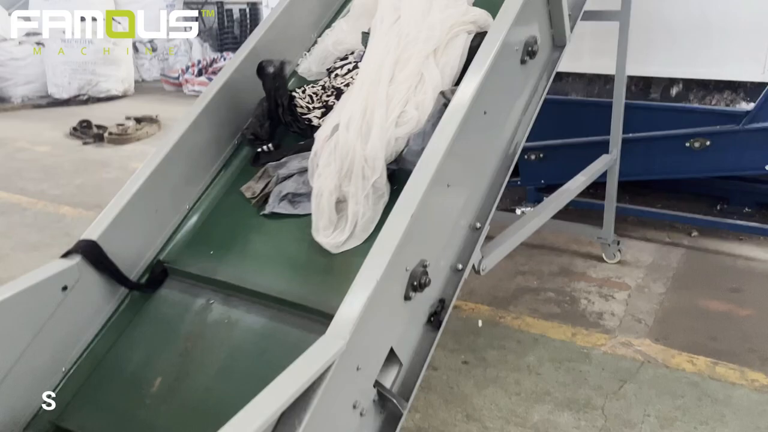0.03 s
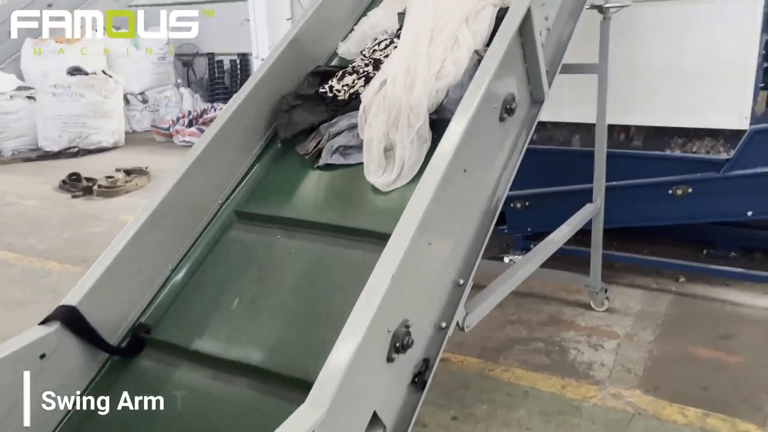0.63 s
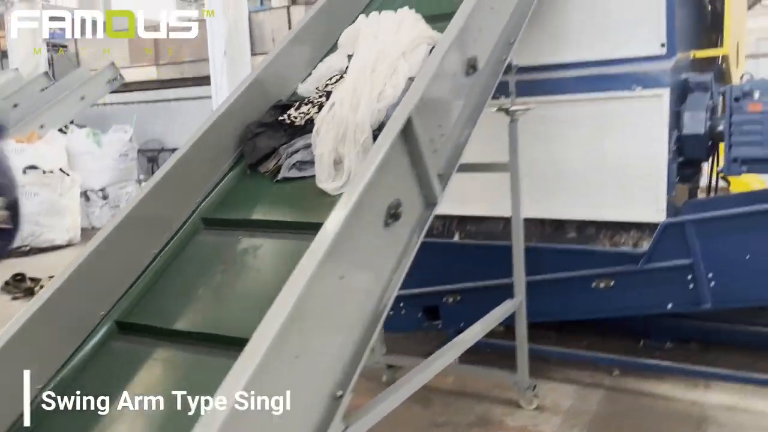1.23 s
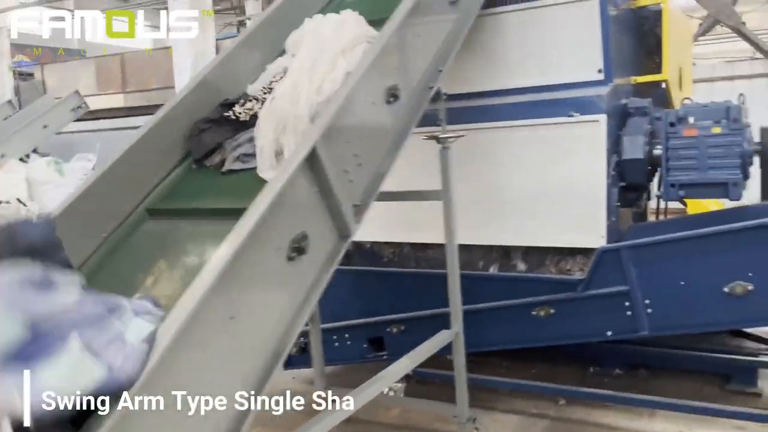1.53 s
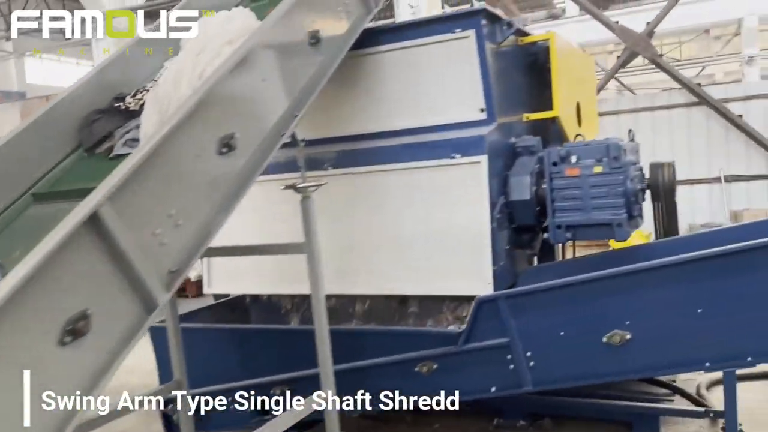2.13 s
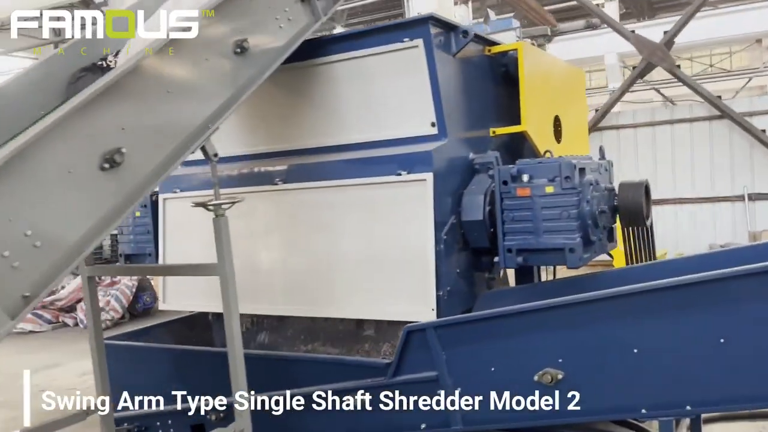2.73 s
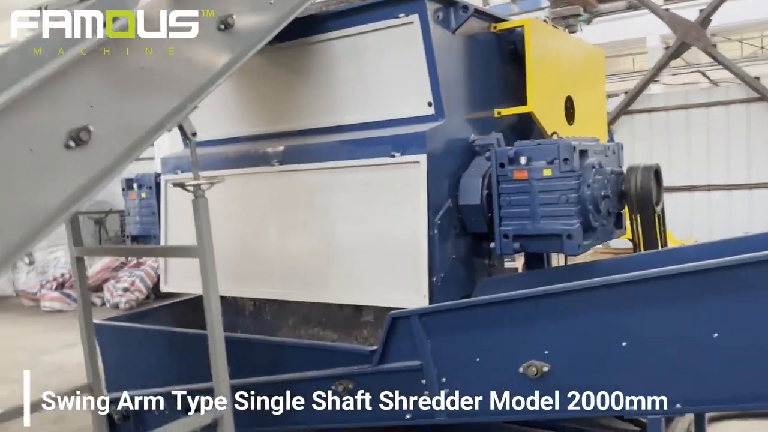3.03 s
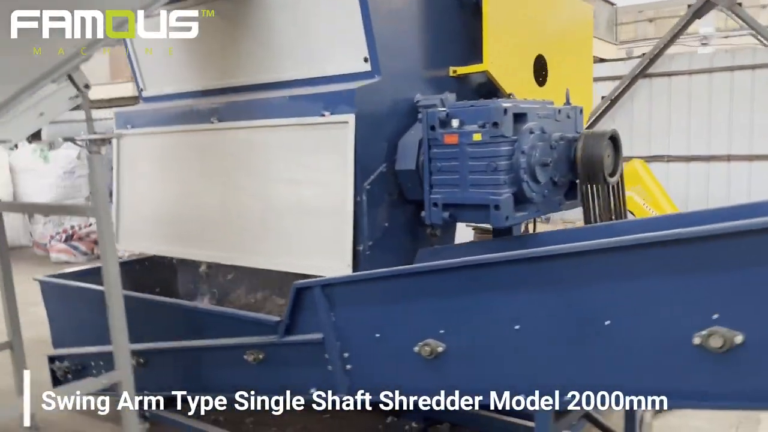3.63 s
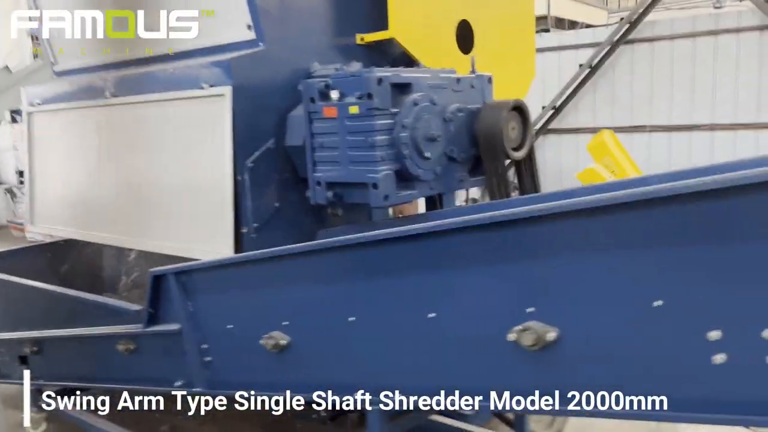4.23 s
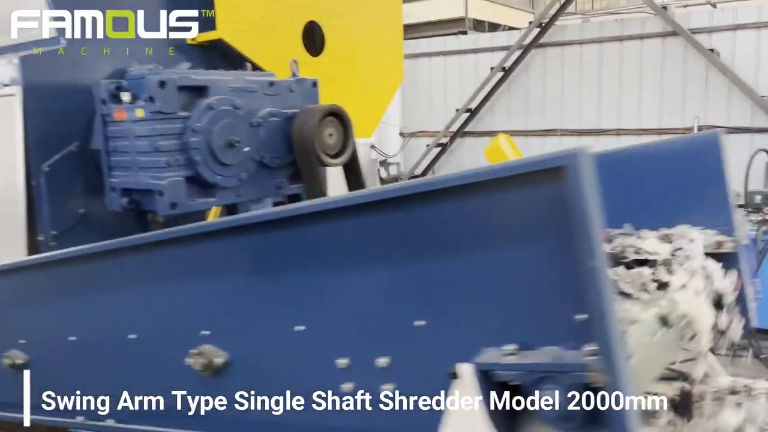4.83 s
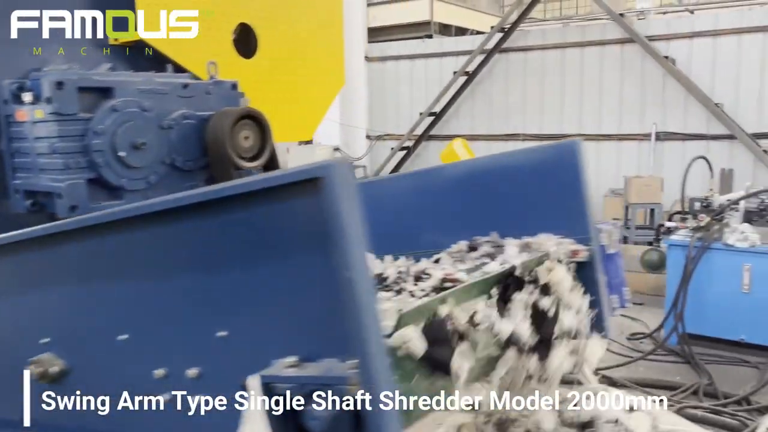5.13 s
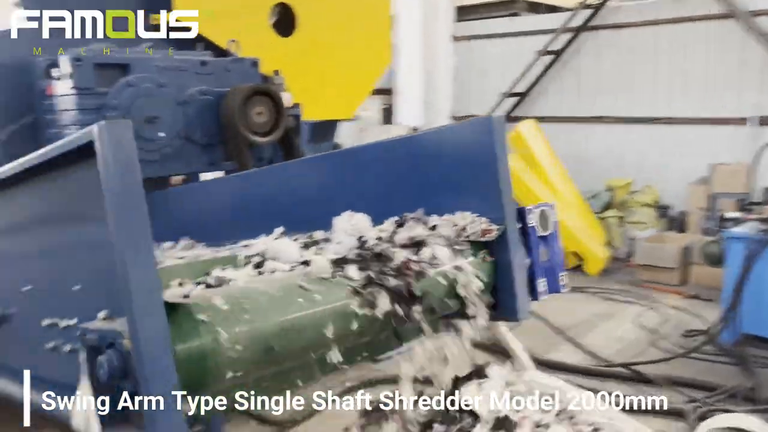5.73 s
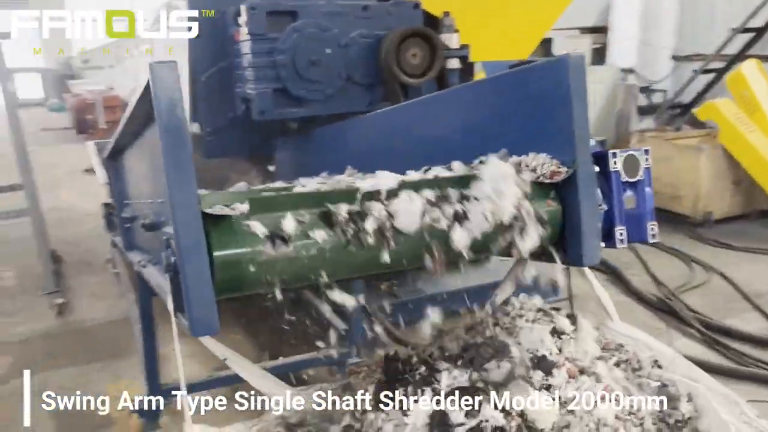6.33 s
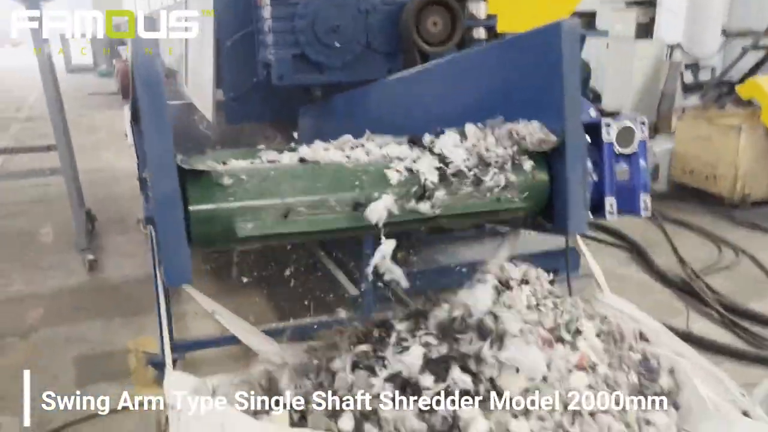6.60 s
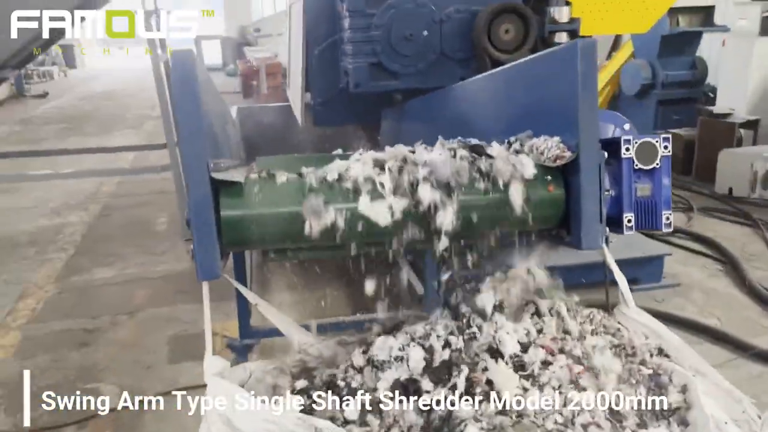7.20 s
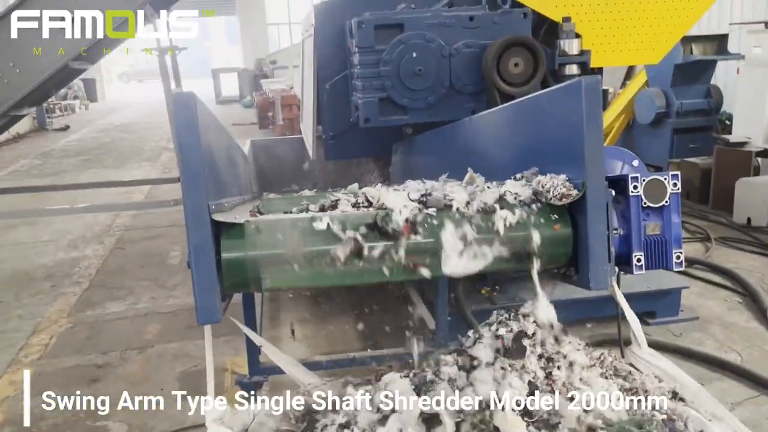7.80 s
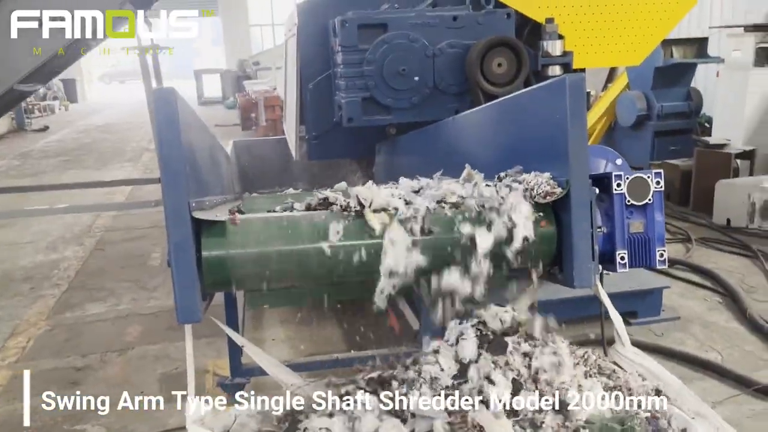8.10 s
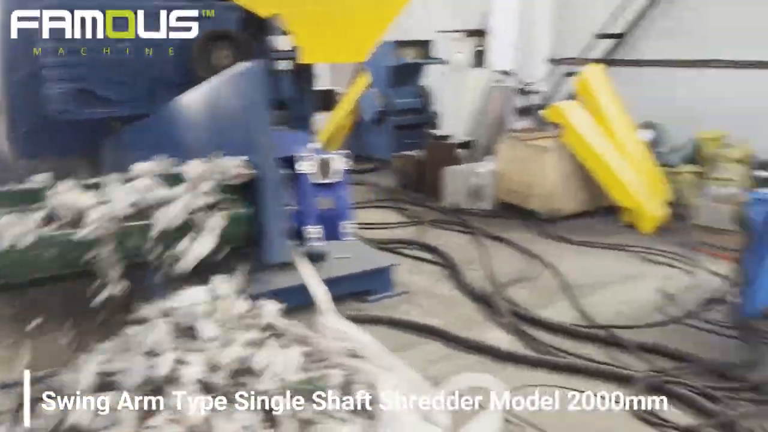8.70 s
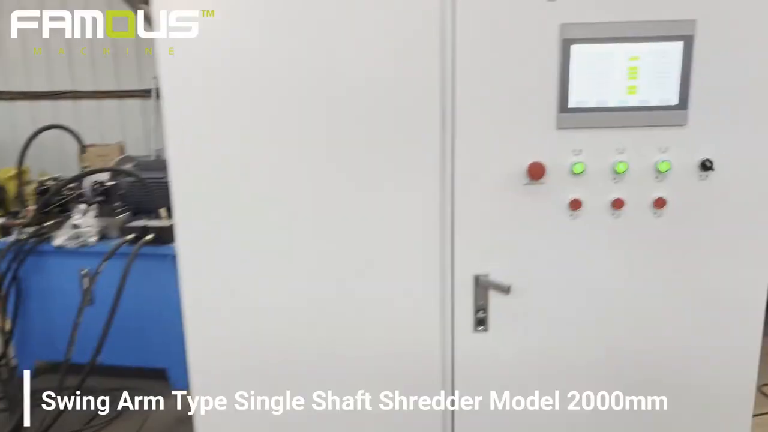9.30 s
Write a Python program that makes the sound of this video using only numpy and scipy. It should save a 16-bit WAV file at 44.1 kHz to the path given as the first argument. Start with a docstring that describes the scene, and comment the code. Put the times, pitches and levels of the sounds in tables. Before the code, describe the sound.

A large shredder roars and rumbles in a factory hall, tearing cloth with dull thuds while shreds rustle off a belt.

```python
"""A factory hall, walking beside a single-shaft shredder from its feed belt to its discharge belt.
It chews textile waste: rotor knives thump the steel housing about twenty times a second, and the
roar and the tearing swell with each load. Thick wads jolt the body, a panel drones, tones come and
go, metal chinks, and shreds rustle and tick off the belt. The hall smears the cutting and shreds.
Heard through a microphone with two close ports; the sound starts abruptly."""
import sys
import numpy as np
from scipy import signal
from scipy.fft import rfft, irfft, next_fast_len
from scipy.io import wavfile
from scipy.ndimage import uniform_filter1d, map_coordinates

SR = 44100
rng = np.random.default_rng(int(sys.argv[2]) if len(sys.argv) > 2 else 0)


def to_wav(sig):
    """Store sig (one row per channel, or 1-D mono) as 16-bit WAV at the path in sys.argv[1].

    Samples outside -1..1 are clipped; the rate is SR.
    """
    pcm = np.clip(np.atleast_2d(sig), -1, 1) * 32767
    pcm = np.round(pcm).astype(np.int16)
    wavfile.write(sys.argv[1], SR, pcm.T)  # frames by channels


N = 421155


def amp(db):
    """Decibels to gain."""
    return 10 ** (np.asarray(db) / 20)


def unit(x):
    """Scale to rms 1."""
    return x / np.sqrt(np.mean(x ** 2) + 1e-20)


def along(points, hz):
    """Read (f/Hz, value) points on a log axis."""
    f, v = np.transpose(points)
    return np.interp(np.log(hz + 1), np.log(f + 1), v)


def curves(rows):
    """One value per sample for each column after the time."""
    times, *columns = np.transpose(rows)
    return [np.interp(np.arange(N) / SR, times, column) for column in columns]


def wobble(rate):
    """A smooth random curve, rate knots a second."""
    return map_coordinates(rng.standard_normal(int(N * rate / SR) + 4), [np.arange(N) * rate / SR])


def noise():
    """A pair of white noises: what both microphone ports share, and what sets them apart."""
    return rng.standard_normal((2, N))


def centred(x):
    """One signal as a pair: all shared by the ports, nothing apart."""
    return np.array([x, np.zeros(N)])


def filtered(x, response):
    """x through a complex frequency response."""
    size = next_fast_len(N + SR // 2, real=True)
    return irfft(rfft(x, size) * response(np.fft.rfftfreq(size, 1 / SR)), size)[..., :N]


def coloured(x, spectrum):
    """x shaped by a (f/Hz, level/dB) spectrum, at rms 1."""
    return unit(filtered(x, lambda hz: amp(along(spectrum, hz))))


def ringing(x, modes):
    """x through steep-sided resonances, at rms 1."""
    band = lambda f, hz, width: (2j * f * width / (hz * hz - f * f + 2j * f * width)) ** 2
    return unit(filtered(x, lambda f: sum(amp(db) * band(f, hz, width) for hz, width, db in modes)))


def steadied(x):
    """Keep the fast beating of a vibration but hold it at rms 1 over a quarter second."""
    return x / np.sqrt(np.abs(uniform_filter1d(x * x, size=SR // 4)) + 1e-9)


def grains(rate, spread_db):
    """Tiny random clicks of varying size, rate a second."""
    size = amp(spread_db * np.minimum(rng.exponential(size=N), 4))
    return unit(noise() * size * (rng.random(N) < rate / SR))


def patchy(x, depth_db):
    """Each scrap has its own pitch: the colour shifts from moment to moment."""
    spectra = signal.stft(x, nperseg=512)[2]
    patches = uniform_filter1d(rng.standard_normal(spectra.shape[1:]), size=5, axis=0)
    patches = uniform_filter1d(patches, size=7, axis=1)
    return signal.istft(spectra * amp(depth_db * unit(patches)), nperseg=512)[1][:, :N]


def bursts(hits, attack_s, t60):
    """The envelope of (t/s, level/dB) hits that rise quickly and die away."""
    t, out = np.arange(SR // 2) / SR, np.zeros(N + SR)
    for s, db in hits:
        out[round(s * SR):][:len(t)] += amp(db - 60 * t / t60) * (1 - np.exp(-t / attack_s))
    return out[:N]


def hum(hz, waver_hz, sway_db):
    """A tone of rms 1 whose pitch and strength waver at random."""
    phase = 2 * np.pi * np.cumsum(hz + waver_hz * wobble(7)) / SR
    return unit(np.sin(phase) * amp(sway_db * wobble(11)))


# the hall's reverberation time: f/Hz, t60/s
HALL_DECAY = [(100, 0.97), (1000, 1.36), (4000, 0.65), (12000, 0.25)]
def hall(x, wet_db):
    """Add the hall's diffuse tail: shortest in the treble, new every quarter second of the walk."""
    out, step = np.pad(x, ((0, 0), (0, 2 * SR))), SR // 4
    for i in range(0, N, step):
        hz, t, spectra = signal.stft(rng.standard_normal((2, SR // 2)), SR, nperseg=256)
        decay = amp(-60 * t / along(HALL_DECAY, hz)[:, None])
        tail = signal.istft(spectra * decay, SR, nperseg=256)[1]
        echo = signal.fftconvolve(x[:, i:i + step], tail / np.linalg.norm(tail[0]), axes=1)
        out[:, i:i + echo.shape[1]] += amp(wet_db) * echo
    return out[:, :N]


# the side panel's drone, loudest as the microphone passes it: t/s, level/dB
PANEL_LEVEL = [(0.14, -30.5), (0.9, -29.5), (1.27, -22.5), (1.38, -24), (1.52, -14), (1.8, -20.5),
               (2.0, -16), (2.3, -19.5), (2.5, -19), (2.7, -17.5), (2.85, -23.5), (3.3, -20), (3.6, -29.5),
               (3.9, -23), (4.3, -25.5), (6.0, -36), (6.45, -29.5), (7.0, -31), (9.55, -32)]
# its resonance: f/Hz, width/Hz, level/dB
PANEL_MODE = [(187, 14, 0)]
def side_panel():
    """The gear drones through a panel: the closer it is, the more the tone stands out of its rumble."""
    drone_db, = curves(PANEL_LEVEL)
    tone_share = np.clip((drone_db - np.median(drone_db)) / 5, 0, .72)
    tone = centred(steadied(hum(hz=187.5, waver_hz=2.7, sway_db=2)))
    rumble = steadied(ringing(noise(), PANEL_MODE))
    return amp(drone_db) * (np.sqrt(tone_share) * tone + np.sqrt(1 - tone_share) * rumble)


# tones, low hums and one rasp along the walk: start/s, end/s, f/Hz, width/Hz, level/dB
SWELLS = [(3.7, 4.55, 422, 22, -23), (3.1, 4.4, 630, 180, -29), (0.5, 1.5, 764, 11, -37.5),
          (0.0, 1.2, 692, 11, -41.5), (0.0, 1.7, 370, 55, -39), (6, 8.6, 430, 53, -43),
          (1.2, 2.6, 3680, 130, -43), (1.87, 1.945, 3600, 150, -33), (4.5, 6.4, 2520, 260, -42),
          (9.25, 9.55, 2400, 180, -45), (5.08, 5.26, 96, 12.3, -16.5), (5.3, 5.6, 76, 5.2, -18.5),
          (6.12, 6.58, 73, 5.1, -21), (4.04, 4.34, 2100, 600, -34), (8.1, 8.55, 150, 16, -23),
          (1.15, 2.1, 290, 35, -26), (1.7, 2.05, 71, 6.1, -18), (4.08, 4.3, 318, 19, -22.5),
          (3.95, 4.15, 475, 22, -24), (3.35, 3.6, 330, 49, -23), (7.4, 8.4, 85, 5, -28.5)]
def tones_and_rasp():
    """Wavering tones and low hums swell and fade, plus a brief rasp of tearing cloth near 2 kHz."""
    t, out = np.arange(N) / SR, np.zeros(N)
    for start, end, hz, width, db in SWELLS:
        inside = (t > start) & (t < end)
        age = t[inside] - start
        knots = rng.standard_normal((2, int((end - start) * width * 2) + 4))
        drift, sway = [map_coordinates(k, [age * width * 2]) for k in knots]
        swell = np.sqrt(np.abs(np.sin(np.pi * age / (end - start))))
        tone = np.sin(2 * np.pi * np.cumsum(hz + 0.611 * width * drift) / SR)
        out[inside] += amp(db) * swell * unit(tone * amp(5.5 * sway))
    return centred(out)


# metal chinking on metal: t/s, f/Hz, relative level/dB, t60/s
METAL_CHINKS = [(0.458, 3600, -22, .14), (1.03, 3620, -27, 0.19), (1.235, 3600, -24, 0.19),
                (1.52, 3600, -31, .1), (1.591, 3700, -28, .1), (1.658, 3600, -30, .1),
                (1.775, 3700, -27, .1), (1.885, 3640, -20, 0.14), (1.905, 3550, -20, 0.15),
                (2.566, 3650, -24, .12), (4.93, 2400, -29, .04), (5.111, 2630, -18, .05),
                (5.132, 2470, -19, 0.045), (5.15, 2370, -17, .05), (5.164, 2420, -18, .04),
                (5.183, 2580, -25, .04), (5.212, 2580, -13, 0.051), (5.26, 2400, -19, 0.054),
                (5.347, 2930, -22, 0.059), (6.383, 3650, -25, 0.078), (9.475, 2840, -25, .12)]
def chinks():
    """Each chink rings briefly on a close pair of steel modes, roughened by the rubbing."""
    t, out = np.arange(SR // 4) / SR, np.zeros(N + SR)
    attack = 1 - np.exp(-t / 0.0011)
    for s, hz, db, t60 in METAL_CHINKS:
        detune = rng.normal(1, .012, (2, 1))
        pitch = hz * (detune + .3 * rng.standard_normal((2, len(t))))
        ring = np.sin(2 * np.pi * np.cumsum(pitch, axis=1) / SR).sum(axis=0)
        out[round(s * SR):][:len(t)] += ring * amp(db - 9.5 - 60 * t / t60) * attack
    return centred(out[:N])


# loose shreds on the belt: t/s, relative level/dB
RUSTLE_LEVEL = [(0.14, -53), (1.2, -51), (1.22, -46), (1.95, -39.5), (2.3, -42), (3.14, -39.5), (3.17, -37),
                (3.47, -29.5), (4.15, -35), (4.46, -33.5), (4.68, -32.5), (4.75, -36.5), (5.15, -40),
                (5.33, -31.5), (5.68, -30.5), (6.0, -47.5), (6.3, -45), (6.45, -41.5), (7.9, -51),
                (8.7, -48.5), (9.55, -46)]
# their bright rustle: f/Hz, level/dB
RUSTLE_SPECTRUM = [(3000, 2.5), (6000, 5.5), (8000, 3.5), (10000, 8), (12000, 2.5), (14000, 6.5),
                   (15800, -30)]
def shreds():
    """Loose shreds rustle in quick and slow clumps."""
    rustle_db, = curves(RUSTLE_LEVEL)
    crackle = grains(rate=14000, spread_db=2.9)
    clumps_db = 2.7 * wobble(43) + 0.4 * wobble(4.9)
    return amp(rustle_db - 5.5 + clumps_db) * coloured(patchy(crackle, depth_db=3.0), RUSTLE_SPECTRUM)


# hard scraps among the shreds: t/s, relative level/dB, offset for the crack/dB
SCRAP_SNAPS = [(0.4464, -38, 7), (0.5428, -36, -3), (1.006, -40, 15), (2.53, -26, 3), (2.7077, -33, 4),
               (3.1572, -19, -8), (3.1926, -29, 3), (3.4501, -20.5, -1), (3.615, -28, -7),
               (4.3056, -26, -3), (4.4772, -33, -7), (4.6638, -21.5, -15), (4.792, -30, -2),
               (4.8499, -29, -3), (4.9402, -29, -1), (4.9626, -29, -2), (5.1148, -25, -11),
               (5.12, -28, -11), (5.2046, -26, -7), (5.341, -24, -4), (5.4525, -25, -10),
               (5.6421, -22, -13), (6.382, -41.5, 8), (6.955, -38, -2), (8.1998, -32, -1), (9.0912, -38, 1),
               (9.1147, -30, -1), (9.2399, -44, 1), (9.2928, -37, -3)]
def snaps():
    """A hard scrap snaps: a tick as bright as the rustle, and a longer crack coloured like tearing."""
    tick = bursts([(s, db - 5) for s, db, _ in SCRAP_SNAPS], attack_s=0.00033, t60=0.035)
    crack = bursts([(s, db + offset - 6) for s, db, offset in SCRAP_SNAPS], attack_s=0.00055, t60=0.18)
    return tick * coloured(noise(), RUSTLE_SPECTRUM) + crack * coloured(noise(), TEAR_SPECTRUM)


# handfuls of shreds flying out: t/s, length/s, level/dB
HANDFULS = [(1.21, 0.09, -44), (1.885, 0.11, -42), (4.017, 0.038, -36), (4.225, 0.06, -34),
            (4.296, 0.09, -35), (4.5, 0.15, -32), (4.657, 0.051, -32), (5.283, 0.049, -40),
            (5.33, 0.09, -36), (5.5, 0.054, -34), (5.573, 0.064, -31), (5.64, 0.11, -40), (5.79, 0.06, -44),
            (6.37, 0.1, -43), (7.25, 0.27, -48)]
# their crisp hiss: f/Hz, level/dB
SPRAY_SPECTRUM = [(3000, -10), (6000, -2.5), (8500, -9), (10000, -5), (12000, -1.5), (14000, -3),
                  (15500, -8)]
def sprays():
    """A handful of shreds flies out as a bright burst of tiny ticks that rises fast and fades."""
    t, envelope = np.arange(N) / SR, np.zeros(N)
    for s, length, db in HANDFULS:
        envelope += amp(db) * np.interp((t - s) / length, [0, .2, .7, 1], [0, 1, .8, 0])
    return envelope * coloured(grains(rate=9000, spread_db=1.5), SPRAY_SPECTRUM)


# hard lumps inside the cutting chamber: t/s, relative level/dB
LUMP_HITS = [(1.701, -25), (1.716, -25), (2.106, -24), (2.13, -32), (2.675, -19), (2.735, -17), (3.04, -19),
             (3.246, -16), (3.296, -13.5), (3.371, -29), (3.441, -20), (3.54, -16), (3.625, -22),
             (3.766, -25), (4.351, -19), (4.449, -28), (5.215, -26), (5.81, -21)]
# their knock: f/Hz, level/dB
KNOCK_SPECTRUM = [(150, 4), (350, 5), (750, 8), (1200, -8), (2300, -7), (4000, -33), (8000, -26),
                  (15000, -55)]
def knocks():
    """A hard lump caught between the knives gives a short, dry knock."""
    return amp(2) * bursts(LUMP_HITS, attack_s=.001, t60=.09) * coloured(noise(), KNOCK_SPECTRUM)


# thick wads hitting the knives: t/s, thud level/dB, crunch level/dB, body jolt level/dB
WAD_HITS = [(1.02, -26, -38, -7.5), (1.25, -24, -42, -7), (1.705, -15.5, -39, -14), (2.112, -15, -35, -25),
            (2.71, -26, -26, -9), (3.04, -34, -30, -12), (3.17, -25, -25, -10.5), (3.27, -27, -30, -8.5),
            (3.441, -25, -33, -18), (4.079, -24, -37, -6.5), (4.15, -21, -28, -16), (4.35, -28, -25, -18),
            (5.11, -22.5, -42, -13), (5.216, -32, -34, -27), (5.45, -26, -40, -20), (6.265, -29, -46, -14),
            (6.325, -23, -44, -19), (6.372, -26, -31, -23), (6.43, -26, -40, -19), (7.30, -30, -41, -28),
            (9.11, -32, -42, -12.5)]
# a wad's thud: f/Hz, level/dB
THUD_SPECTRUM = [(40, -25), (80, -0.5), (200, -4), (400, -21), (900, -11), (3000, -32), (15000, -80)]
# its crunch: f/Hz, level/dB
CRUNCH_SPECTRUM = [(300, -16), (700, 10), (1200, -2), (2500, 3), (4000, -17), (8000, -30), (15000, -55)]
def wads():
    """A thick wad meets the knives with a dull thud and a gritty crunch."""
    thud = bursts([(s, db) for s, db, _, _ in WAD_HITS], attack_s=.004, t60=.25)
    crunch = bursts([(s, db) for s, _, db, _ in WAD_HITS], attack_s=.002, t60=.2)
    return thud * coloured(noise(), THUD_SPECTRUM) + crunch * coloured(noise(), CRUNCH_SPECTRUM)


# the deep shudder, fading on the way round to the discharge belt: t/s, level/dB
SHUDDER_REACH = [(0.14, 3.5), (3.3, -1), (5.3, -2.5), (5.7, -13), (9.55, -5.5)]
# resonances of the frame, the steel housing and the hopper walls: f/Hz, width/Hz, level/dB
FRAME_MODES = [(39.5, 3, -9), (46, 8, -15), (60.5, 7, 0)]
HOUSING_MODES = [(75.5, 14, -4.5), (97, 12.4, 4), (118.8, 19, -4)]
HOPPER_MODES = [(141.6, 7.7, -0.5), (162.1, 26.8, 3), (216, 11.6, -2.5), (242.5, 56, -12.5)]
# the housing's broad rumble: f/Hz, level/dB
RUMBLE_SPECTRUM = [(40, -40), (55, -22), (68, -10), (100, 15.5), (130, 4.5), (200, -10), (300, -12),
                   (500, -58)]
def body(blows, effort_db):
    """Knife blows and churning cloth shake the machine's body, harder under load; wads jolt it."""
    reach_db, = curves(SHUDDER_REACH)
    shaking = lambda: amp(-5.0) * unit(blows) + noise()
    jolts = bursts([(s, db) for s, _, _, db in WAD_HITS], attack_s=0.043, t60=0.59)

    shudder = np.hypot(amp(-31.5 + 0.73 * effort_db + 0.63 * wobble(5.3)), amp(-15) * jolts)
    frame = amp(reach_db) * shudder * steadied(ringing(shaking(), FRAME_MODES))

    steel = ringing(shaking(), HOUSING_MODES) + amp(-6.5) * coloured(noise(), RUMBLE_SPECTRUM)
    drive = .6 * centred(hum(hz=75, waver_hz=1.1, sway_db=3))
    housing_gain = np.hypot(amp(-23 + 0.15 * effort_db + 0.33 * reach_db), jolts)
    housing = housing_gain * steadied(unit(steel) + drive)

    hopper_gain = amp(-25 + 0.19 * effort_db + 2.0 * wobble(5.5))
    hopper = hopper_gain * steadied(ringing(noise(), HOPPER_MODES))
    return frame + housing + hopper


# the load on the knives: t/s, relative roar level/dB, relative tearing level/dB
CUTTING_LOAD = [(0.14, -28, -38.5), (0.9, -29.5, -36.5), (1.19, -24.5, -33), (1.3, -23, -30.5),
                (1.93, -19.5, -27.5), (2.42, -23.5, -31), (3.12, -20, -29.5), (3.22, -18.5, -26.5),
                (3.52, -19.5, -27), (3.9, -22, -30.5), (4.17, -19, -30.5), (4.45, -20.5, -31),
                (4.8, -24, -35.5), (5.05, -25, -36), (5.3, -19, -30.5), (5.7, -22.5, -30), (6.0, -27, -37),
                (6.27, -25, -38), (6.4, -20.5, -35.5), (6.7, -27, -35.5), (7.3, -25.5, -38.5),
                (7.85, -28, -39), (8.75, -27.5, -38), (9.15, -28.5, -36.5), (9.45, -26, -37)]
# cloth being crushed, and fibres ripping: f/Hz, level/dB
ROAR_SPECTRUM = [(130, -1), (240, 1.5), (420, 2.5), (540, -5), (660, -4.5), (780, -4.5), (950, -8),
                 (1300, -8.5), (1600, -12.5), (1800, -22), (2600, -19.5), (5000, -54)]
TEAR_SPECTRUM = [(800, -25), (1500, 3), (2000, 1), (2600, -1.5), (3100, -1.5), (3700, -2), (4800, -6.5),
                 (5800, -11), (7200, -5), (8500, -19), (10500, -16.5), (15000, -28.5)]
# resonances of the cutting chamber: f/Hz, width/Hz, level/dB
CHAMBER_MODES = [(287, 38, -5), (311.1, 9.9, 3), (342, 29.3, 2), (405.4, 23, -1), (443, 70, -5)]
def cutting(cuts):
    """Cloth is crushed in the ringing chamber and its fibres rip, pulsing slightly with each cut."""
    roar_db, tear_db = curves(CUTTING_LOAD)
    tug = wobble(22)  # the cloth gives way unevenly
    chewing = grains(rate=9000, spread_db=1.4) * (1 + 0.14 * cuts)
    roar = amp(roar_db - 1.49 + 0.86 * tug) * coloured(chewing, ROAR_SPECTRUM)
    chamber = amp(roar_db - 7) * ringing(noise(), CHAMBER_MODES)
    ripping = grains(rate=16000, spread_db=0.5) * (1 + 0.048 * cuts)
    tear_gain = amp(tear_db - 2.5 + 0.33 * tug + 1.05 * wobble(30))
    return roar + chamber + tear_gain * coloured(patchy(ripping, depth_db=1.5), TEAR_SPECTRUM)


def knife_bites(rate_hz, scatter_s, spread_db, decay_s):
    """Each knife row meets the cloth a little early or late: the blows, and their cuts' envelope."""
    count = int(N / SR * rate_hz)
    lateness, force = rng.standard_normal((count, 2)).T
    when = np.arange(count) / rate_hz + scatter_s * lateness
    blows = np.bincount(np.clip(when * SR, 0, N - 1).astype(int), amp(spread_db * force), N)
    cuts = signal.lfilter([1], [1, -np.exp(-1 / (decay_s * SR))], blows)
    return blows, unit(cuts)


def shredder(usual_roar_db=-25):
    """The knives drive body and cut; the body is heard direct, the cut and its debris with the hall."""
    blows, cuts = knife_bites(rate_hz=19.6, scatter_s=0.003, spread_db=3.0, decay_s=0.012)
    effort_db = curves(CUTTING_LOAD)[0] - usual_roar_db
    vibration = body(blows, effort_db)
    shredding = cutting(cuts) + shreds() + snaps() + sprays() + knocks() + chinks()
    return vibration + hall(shredding, wet_db=-8.5)


# how alike the microphone's two ports sound: f/Hz, coherence/0-1
PORT_COHERENCE = [(60, .997), (150, .98), (350, .9), (700, .76), (1300, .45), (1900, .7), (3200, .55),
                  (5000, .45), (6500, .7), (8300, .98), (10000, .74), (12000, .96), (14000, .74)]
# the left port's lead over the right: f/Hz, phase/rad
LEFT_LEAD = [(40, 0), (200, .1), (450, .38), (1000, .8), (1570, 2.2), (1750, .2), (3000, .8), (4800, .5),
             (5500, -.8), (7000, -1.9), (8350, -3.14), (11700, -6.1), (12300, -6.5), (13500, -7.8),
             (15400, -9.3)]
# the left port's level over the right: f/Hz, level/dB
LEFT_BALANCE = [(170, 0), (500, 1.4), (1000, -.2), (2000, 1.4), (4000, 1.4), (7000, 0)]
def ports(pair):
    """Two close microphone ports: alike in the bass, out of step in the treble."""
    size = next_fast_len(N + SR // 2, real=True)
    hz = np.fft.rfftfreq(size, 1 / SR)
    mix_angle = np.arccos(np.clip(along(PORT_COHERENCE, hz), 0, 1)) / 2
    shared, apart = rfft(pair, size) * [np.cos(mix_angle), np.sin(mix_angle)]
    skew = np.exp(.5j * along(LEFT_LEAD, hz)) * amp(along(LEFT_BALANCE, hz) / 2)
    left, right = (shared + apart) * skew, (shared - apart) / skew
    return irfft(np.array([left, right]), size)[:, :N]


def scene():
    """The whole machine at the two ports."""
    return ports(shredder() + side_panel() + tones_and_rasp() + wads())


def record(dry):
    """The microphone drops the deepest bass and top treble and rounds peaks; the sound cuts in."""
    low_cut_hz, top_hz, ceiling, start_s = 41, 15200, .93, 0.12
    trimmed = filtered(dry, lambda hz: 1 / np.sqrt(1 + (low_cut_hz / (hz + 1)) ** 14))
    rounded = trimmed / (1 + np.abs(trimmed / ceiling) ** 6) ** (1 / 6)
    return filtered(rounded * (np.arange(N) / SR >= start_s), lambda hz: hz < top_hz)


dry = scene()
out = record(dry)
to_wav(out)
```